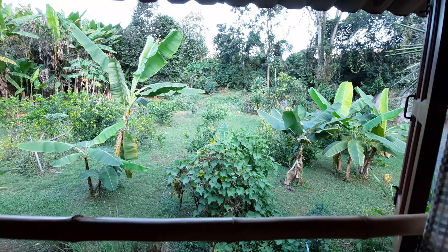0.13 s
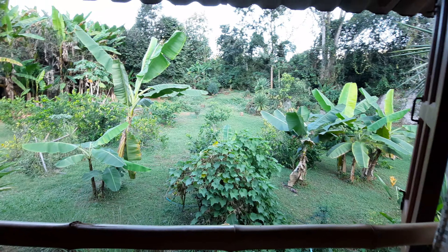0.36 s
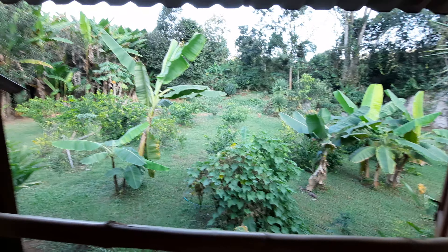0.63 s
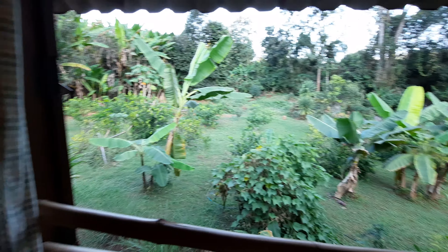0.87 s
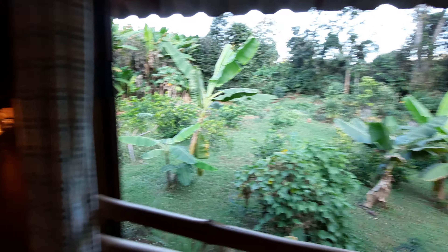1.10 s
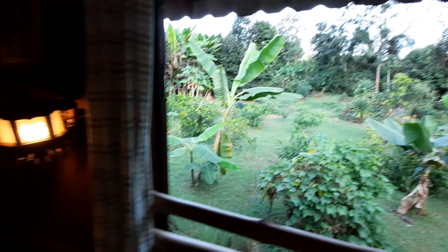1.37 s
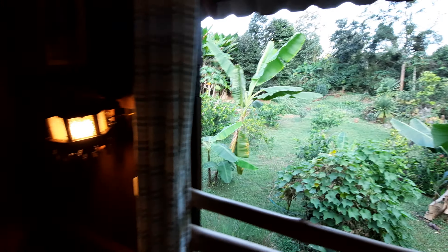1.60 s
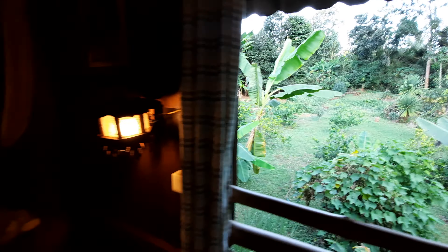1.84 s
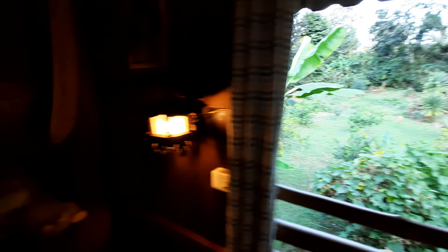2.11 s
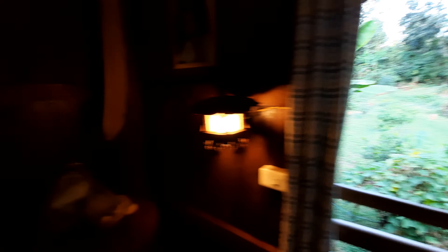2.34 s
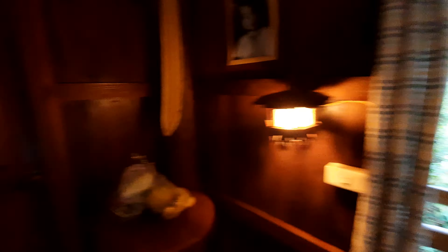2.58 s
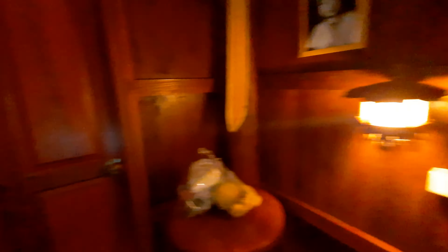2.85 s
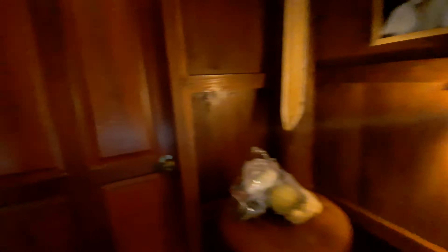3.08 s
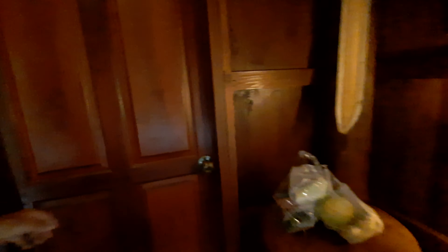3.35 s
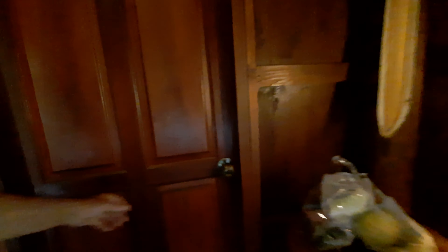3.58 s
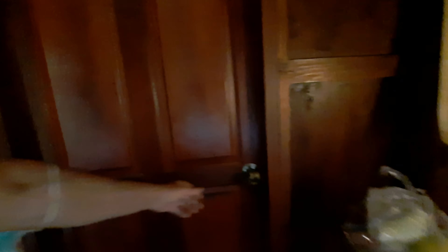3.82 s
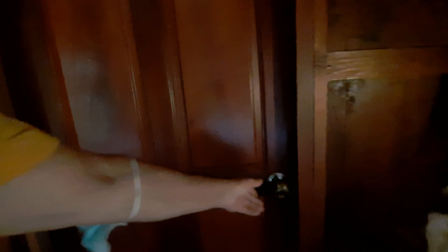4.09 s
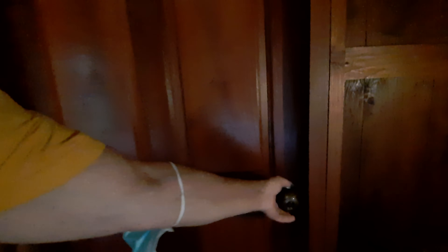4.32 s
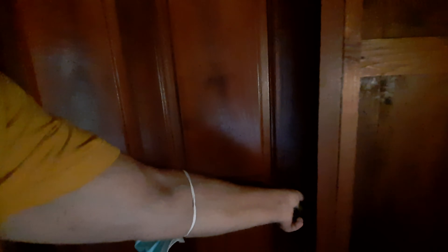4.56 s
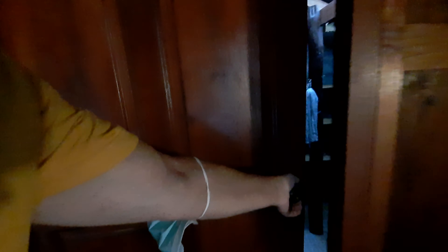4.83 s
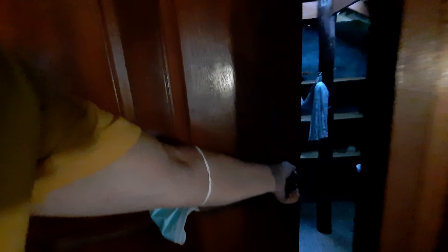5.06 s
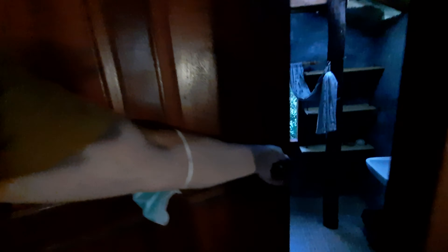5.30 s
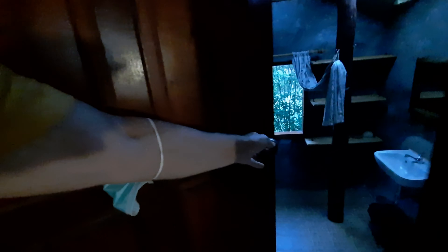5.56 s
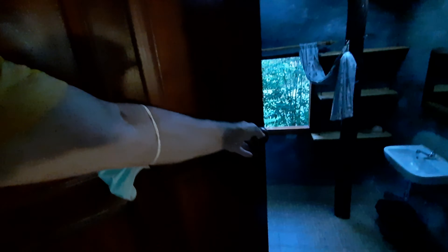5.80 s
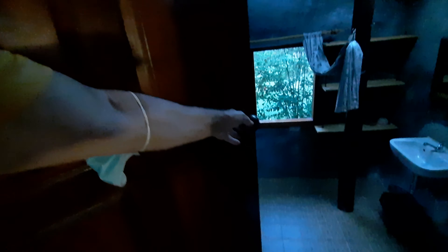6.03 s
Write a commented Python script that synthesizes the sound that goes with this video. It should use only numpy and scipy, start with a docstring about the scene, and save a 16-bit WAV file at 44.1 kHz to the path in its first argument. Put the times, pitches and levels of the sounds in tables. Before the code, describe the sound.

Crickets trill steadily outside a quiet wooden cabin; a stiff door latch snaps and the door jolts open with a loud woody clunk, then softer knocks.

```python
"""A person steps across the boards of a cabin, turns the knob and pulls a stiff wooden door free: noisy jolts
ring the modes of the wood, sharp cracks ring the latch, and narrow noise hums as the door swings.
Sparse random taps make the small wooden room ring after each blow. Through the open window come crickets and
a raspy insect (pulsed noise in resonances), a small bird (falling sines), faint fuzzy tones, and a far engine
(a sum of low harmonics), over quiet air of shaped noise."""
import sys
import numpy as np
from scipy import signal
from scipy.fft import rfft, irfft
from scipy.io import wavfile
from scipy.ndimage import uniform_filter1d

SR = 44100
rng = np.random.default_rng(int(sys.argv[2]) if len(sys.argv) > 2 else 0)


def bounce(signal):
    """Save signal as a 16-bit WAV file at the path given by the first command-line argument."""
    frames = np.transpose(np.atleast_2d(signal))
    limited = np.clip(frames, -1, 1)
    pcm = np.round(limited * 32767).astype(np.int16)
    wavfile.write(sys.argv[1], SR, pcm)


def level_to_linear(level):
    """Convert decibel levels to linear amplitude factors, elementwise."""
    exponent = np.asarray(level, float) / 20
    return 10 ** exponent


N = 272097


def evened(x):
    """Scales to rms 1."""
    return x / np.sqrt(np.mean(x ** 2) + 1e-20)


def read(points, hz):
    """Reads a spectrum table, joined on a log-frequency axis."""
    f, value = np.transpose(points)
    return np.interp(np.log(hz + 1), np.log(f + 1), value)


def follow(rows):
    """Draws the columns of a time curve at every sample."""
    s, *columns = np.transpose(rows)
    return [np.interp(np.arange(N) / SR, s, c) for c in columns]


def add(mix, s, sound):
    """Mixes a stereo sound in at second s, which may lie before the start."""
    first = round(s * SR)
    sound = sound[:, max(-first, 0):]
    part = mix[:, max(first, 0):][:, :sound.shape[1]]
    part += sound[:, :part.shape[1]]


def lean(db):
    """Left and right gains for a level difference, left minus right."""
    return level_to_linear(np.array([db / 2, -db / 2]))


def resonate(x, hz, width):
    """A resonance of gain 1: shifts the curve hz down to zero, smooths, and shifts back."""
    turn = np.exp(2j * np.pi * np.cumsum(hz * np.ones(x.shape[-1])) / SR)
    r = np.exp(-np.pi * width / SR)
    smooth = signal.lfilter([1 - r], [1, -r], x / turn + 1e-18)
    return 2 * (turn * smooth).real


def pair(x, points):
    """Makes the right channel like the left by a share that depends on frequency."""
    z = rfft(x)
    same = np.clip(read(points, np.fft.rfftfreq(x.shape[1], 1 / SR)), -1, 1)
    right = same * z[0] + np.sqrt(1 - same ** 2) * z[1]
    return irfft([z[0], right], x.shape[1])


def wander(seconds, shape):
    """Slow random drift of rms 1: noise smoothed twice."""
    size = round(seconds * SR)
    return evened(uniform_filter1d(uniform_filter1d(rng.standard_normal(shape), size), size))


def hums(rows, blur, pan_db):
    """Noise through a narrow gliding resonance, dying away: a fuzzy tone for each row."""
    out = np.zeros((2, N))
    for s, length, start_hz, end_hz, db in rows:
        n = round(length * SR)
        noise = rng.standard_normal((2, 2 * SR))[:, :n]
        # blur is the width as a share of the starting pitch
        tone = resonate(noise, np.linspace(start_hz, end_hz, n), blur * start_hz)
        level = level_to_linear(db + np.linspace(0, -9, n)) * signal.windows.tukey(n, .5)
        add(out, s, level * evened(tone) * lean(pan_db)[:, None])
    return out


# modes of the panels of door and walls: (frequency [Hz], width [Hz], relative level [dB])
WOOD_MODES = [(68, 22, 0), (110, 18, -7.5), (151, 20, -16), (193, 11, -5.5), (257, 25, -6), (291, 22, -4),
              (375, 60, 2.5), (437.3, 13, 1), (549.5, 40, -9.5), (638, 30, -9.5), (779, 76, -11),
              (878, 30, -5), (1005, 200, -4), (1260, 86, -4.5), (1966, 100, -2.5), (2290, 89, -3.5),
              (2646, 250, -6)]
# left-right likeness of door and room: (frequency [Hz], likeness [-1 to 1])
DOOR_LIKENESS = [(60, 1), (250, 0.9), (700, .6), (1500, .2), (3500, 0.06), (15000, -.1)]


def blow(db, contact, fall_db):
    """A jolt chatters for the contact time and drives the wood; returns the direct sound and the walls' share."""
    t, hz = np.arange(20000) / SR, np.fft.rfftfreq(20000, 1 / SR) + 1
    jolt = pair(rng.standard_normal((2, len(t))), DOOR_LIKENESS)
    # a hard, light tap barely moves the big panels
    bass_db = 0.29 * max(8.5 - fall_db, 0) * np.minimum(np.log2(hz / 500), 0)
    tilt = level_to_linear(bass_db - fall_db * np.log2(1 + hz / 400))
    edges = np.sqrt((1 + (70 / hz) ** 4) * (1 + (hz / 3500) ** 2))
    soft = irfft(rfft(jolt) * tilt / edges)
    contact = max(contact, .002)
    rise_s = .0008 + 0.21 * contact
    soft *= (1 - np.exp(-t / rise_s)) * np.exp(-t / contact)
    panels = sum(level_to_linear(mode_db) * resonate(soft, f, width) for f, width, mode_db in WOOD_MODES)
    # the blows carry no deep bass below about 55 Hz
    panels, soft = signal.lfilter(*signal.butter(3, 55, "high", fs=SR), [panels, soft])
    direct = panels + 0.34 * soft
    to_walls = 0.43 * panels + 0.54 * soft
    return level_to_linear(db) / abs(direct).max() * np.array([direct, to_walls]) * lean(3.5)[:, None]


# blows and rubs on door and boards:
# (time [s], direct peak before the stereo lean [dB], contact [s], least 2 ms in use, treble fall [dB/octave])
BLOWS = [(0.121, -51, 0.032, 11), (3.99, -52.5, 0.067, 14.5), (4.4, -49.5, 0.0098, 4),
         (4.413, -41, 0.053, 4.5), (4.444, -33.5, 0.02, 2.5), (4.486, -36, 0.012, 7.5),
         (4.503, -35, 0.018, 8), (4.52, -27, 0.013, 6.5), (4.53, -13.5, 0.017, 5.5),
         (4.553, -15, 0.012, 13), (4.617, -15.5, 0.017, -1.5), (4.65, -10.5, 0.0019, 1.5),
         (4.656, -10.5, 0.0043, 3), (4.86, -54, 0.078, 12), (5.05, -59, 0.086, 16), (5.189, -58, .05, 12.5),
         (5.275, -60.5, .02, 0.5), (5.311, -43, 0.011, 3.5), (5.321, -33, 0.01305, 4),
         (5.344, -29, 0.021, 5), (5.383, -42, 0.0066, 2), (5.43, -47, 0.023, 7.5), (5.48, -49.5, 0.04, 10),
         (5.577, -42.5, 0.024, 14), (5.62, -48.5, 0.025, 23.5), (5.735, -66.5, 0.072, 10.5),
         (5.891, -43, 0.025, 8), (5.94, -45, 0.019, 18.5)]


def door_and_boards(near, spread):
    """Strikes every blow and rub, into the near sound and into what reaches the walls."""
    for s, *row in BLOWS:
        direct, to_walls = blow(*row)
        add(near, s, direct)
        add(spread, s, to_walls)


# rings of knob and bolt: (frequency [Hz], width [Hz], relative level [dB])
LATCH_MODES = [(3690, 390, 7.5), (5820, 480, 3), (6340, 117, 2), (9210, 430, -10), (11440, 340, 2),
               (12750, 360, -0.5)]


def click(db):
    """A sharp crack rings the latch; returns the direct sound and what reaches the walls."""
    t, hz = np.arange(4096) / SR, np.fft.rfftfreq(4096, 1 / SR) + 1
    jolt = pair(rng.standard_normal((2, len(t))), DOOR_LIKENESS)
    edges = np.sqrt((1 + (2500 / hz) ** 2) * (1 + (hz / 13000) ** 8))
    crack = irfft(rfft(jolt) / edges) * np.exp(-t / 0.0014)
    ring = sum(level_to_linear(mode_db) * resonate(crack, f, width) for f, width, mode_db in LATCH_MODES)
    direct = ring + 0.059 * crack
    to_walls = 0.56 * ring + 0.17 * crack  # thin rings beam at the listener, so the walls get less
    return level_to_linear(db) / abs(ring).max() * np.array([direct, to_walls]) * lean(1)[:, None]


# clicks of knob and bolt: (time [s], peak of the ring before the stereo lean [dB])
CLICKS = [(4.412, -49), (4.444, -37.5), (4.486, -57.5), (4.522, -27.5), (4.53, -33), (4.617, -1.5),
          (4.651, -25.5), (4.656, -28), (5.31, -55.5), (5.321, -57.5), (5.344, -63), (5.384, -60)]


def knob_and_bolt(near, spread):
    """Snaps every click of the latch, into the near sound and into what reaches the walls."""
    for s, db in CLICKS:
        direct, to_walls = click(db)
        add(near, s, direct)
        add(spread, s, to_walls)


# hums of the moving door: (time [s], length [s], start pitch [Hz], end pitch [Hz], starting level [dB])
SWING = [(4.82, 0.56, 1000, 985, -72), (4.85, 0.34, 1348, 1283, -78), (4.82, 0.35, 375, 370, -65.5),
         (5.575, 0.17, 960, 960, -69), (5.885, 0.12, 2670, 2615, -70.5), (5.89, 0.17, 1500, 1450, -68)]


def swing():
    """The swinging door hums faintly on its hinges: wide, fuzzy gliding tones."""
    return hums(SWING, blur=.06, pan_db=4.5)


# strokes: (time [s], length [s], level before the stroke's shape [dB], rise [share of length], lowest [Hz])
BRUSHES = [(.105, 0.077, -61.5, 0.21, 910), (2.99, 0.089, -71, 0.057, 1400),
           (3.33, 0.3, -64.5, 0.088, 1480), (3.45, 0.12, -66.5, 0.37, 1390), (3.86, 0.24, -68.5, 0.37, 890)]
# colour of every stroke: (frequency [Hz], relative density [dB per Hz])
BRUSH_COLOUR = [(180, -29), (300, -24), (555, 0.5), (1810, -3.5), (4230, -10), (4910, -5.5), (14000, -8),
                (16000, -11)]


def brushes():
    """Cloth and soles brushing: fine clumped grains of sliding under a soft stroke."""
    out = np.zeros((2, N))
    size = 16384
    hz = np.fft.rfftfreq(size, 1 / SR)
    for s, length, db, rise, low_hz in BRUSHES:
        grains = rng.standard_normal((2, size)) * level_to_linear(2.5 * wander(0.00052, size))
        low_cut = np.sqrt(1 + (low_hz / (hz + 1)) ** 6)
        grains = irfft(rfft(grains) * level_to_linear(read(BRUSH_COLOUR, hz)) / low_cut)
        along = np.arange(size) / SR / length
        stroke = np.interp(along, [0, np.clip(rise, .01, .9), 1], [0, 1, 0])
        add(out, s, level_to_linear(db) * evened(grains) * stroke * lean(2.6)[:, None])
    return out


# ring of the small wooden room: (frequency [Hz], time to fall 60 dB [s])
ROOM_DECAY = [(80, .55), (250, .45), (700, .38), (1600, .4), (2800, .47), (4000, .4), (6000, .31),
              (14000, .22)]


def room(x):
    """Sparse taps of random sign, one in every 20 samples, each band dying at its own speed."""
    taps = np.zeros((2, SR))
    slots = np.arange(200, SR - 20, 20)
    at = slots + rng.integers(0, 20, (2, len(slots)))
    np.put_along_axis(taps, at, rng.choice([-1., 1.], at.shape), 1)
    hz, t, z = signal.stft(pair(taps, DOOR_LIKENESS), SR, nperseg=512)
    fall_db = -60 * t / read(ROOM_DECAY, hz)[:, None]
    # the harder room behind the door: 20 dB fainter, and 1.8 times slower to die
    beyond_db = -20 + fall_db / 1.8
    tail = signal.istft(z * np.hypot(level_to_linear(fall_db), level_to_linear(beyond_db)), SR, nperseg=512)[1]
    return signal.fftconvolve(x, tail / np.linalg.norm(tail[0]), axes=1)[:, :N]


# chorus as the listener turns from the window: (time [s], level [dB], left minus right [dB])
CHORUS = [(0, -71, -2), (1, -70.5, -3), (1.6, -71.5, -4), (2.2, -71.5, -6), (2.8, -73, -3),
          (3.2, -75.5, -2), (4.4, -77, -1), (5, -79, 0), (5.8, -80.5, 0), (6.17, -79.5, 0)]
# near singers are narrow, the far crowd is a wide blur:
# (frequency [Hz], width [Hz], mean pulse rate [1/s], relative level [dB])
CRICKETS = [(4870, 70, 57, -1), (4820, 110, 66, -6), (5150, 70, 44, 0), (5190, 110, 54, -5),
            (5020, 400, 40, -4), (4600, 450, 47, -8)]


def crickets():
    """Each wing stroke is a short tone; leaves scatter it differently to either ear."""
    out = np.zeros((2, N))
    for hz, width, rate, db in CRICKETS:
        turns = np.cumsum(rate * (1 + 0.057 * wander(0.37, N))) / SR + rng.random()
        strokes = (0.3 + np.sin(np.pi * turns) ** 2) * level_to_linear(db + 1.5 * wander(0.086, N))
        tone = resonate(resonate(rng.standard_normal((2, N)), hz, width), hz, 1.8 * width)
        out += strokes * evened(tone)
    level_db, pan_db = follow(CHORUS)
    return evened(out) * level_to_linear(level_db) * lean(pan_db)


# a higher, raspier insect: (time [s], level [dB], left minus right [dB])
RASP_LEVEL = [(0, -75, 3), (.5, -74.5, 4), (1.2, -75.5, 1), (1.7, -77, -2), (2.4, -80, -4), (3.2, -81, -2),
              (3.7, -82.5, 0), (5.1, -85, 1), (6.17, -83, 2)]
# its wing resonances: (frequency [Hz], width [Hz], relative level [dB])
RASP_BANDS = [(8700, 1400, 0), (9700, 1200, -2), (11000, 1300, -11)]


def rasp():
    """Quick regular scrapes ring a broad high wing resonance that slides down along each scrape."""
    scrapes_per_s, slide_half_hz = 102, 500  # mean rate; slides from +500 to -500 Hz
    along = np.cumsum(scrapes_per_s * (1 + 0.046 * wander(0.27, N))) / SR % 1
    scrapes = rng.standard_normal((2, N)) * (0.98 + np.sin(np.pi * along) ** 2)
    slide_hz = slide_half_hz * (1 - 2 * along)
    ring = np.zeros((2, N))
    for hz, width, db in RASP_BANDS:
        sliding = resonate(scrapes, hz + slide_hz, width)
        ring += level_to_linear(db) * resonate(sliding, hz, width)
    level_db, pan_db = follow(RASP_LEVEL)
    return evened(ring) * level_to_linear(level_db) * lean(pan_db)


# chips of a small bird: (time [s], peak before the stereo lean [dB])
CHIPS = [(1.8141, -82), (2.0894, -82), (2.145, -79), (2.3394, -88), (2.3817, -79), (2.4244, -76),
         (2.6144, -78), (2.6638, -75), (2.7127, -75)]


def bird():
    """Each chip is a short sine falling in pitch under a smooth swell."""
    out = np.zeros((2, N))
    n = round(0.034 * SR)
    chip = np.sin(2 * np.pi * np.cumsum(np.linspace(4550, 4000, n)) / SR) * np.hanning(n)
    for s, db in CHIPS:
        add(out, s, level_to_linear(db) * chip * lean(-2.3)[:, None])
    return out


# faint tones far away: (time [s], length [s], start pitch [Hz], end pitch [Hz], starting level [dB])
FAR_TONES = [(-.15, 1.14, 1947, 1888, -81), (.2, 0.35, 945, 923, -85), (.32, 0.18, 1530, 1560, -87),
             (.42, 0.19, 993, 1070, -86), (.53, 0.27, 1082, 1094, -82.5), (.5, 0.22, 2600, 2620, -90),
             (.53, 0.33, 2370, 2360, -89), (.78, 0.13, 1200, 1240, -90), (1.36, 0.35, 2224, 2110, -87),
             (2.72, 0.16, 1124, 1150, -86)]


def far_tones():
    """Faint fuzzy tones that glide, well to the left."""
    return hums(FAR_TONES, blur=.012, pan_db=17.5)


# the engine slowing down: (time [s], firing rate [Hz])
ENGINE_SPEED = [(0, 22.3), (.4, 22.2), (2, 20.2), (3.2, 20), (3.6, 19.78), (5.2, 19.65), (6.17, 19.35)]
# its sound through the open window, before the fade: (frequency [Hz], level per harmonic [dB])
EXHAUST = [(60, -85), (90, -76.5), (115, -75), (140, -81), (165, -95.5), (210, -97), (243, -74.5),
           (270, -79), (300, -107)]
# its boom through the walls, swelling as the listener steps from the window:
# (time [s], level of a harmonic at the favoured pitch [dB])
BOOM = [(0, -77), (1.2, -81), (1.6, -70), (2.45, -63.5), (2.8, -61.5), (3.04, -67.5), (3.2, -60),
        (3.6, -60.5), (4.2, -59), (4.4, -62), (5.1, -67), (5.5, -69.5), (5.8, -61), (6.17, -79)]


def engine():
    """Low harmonics of the firing rate beat into a throb, by the window and, booming, through the walls."""
    rate, boom_db = follow(ENGINE_SPEED)[0], follow(BOOM)[0]
    turns = np.cumsum(rate) / SR
    # the window path fades by 3.5 dB/s once the listener turns away at 0.47 s
    fade_db = 3.5 * np.maximum(np.arange(N) / SR - 0.47, 0)
    hum = np.zeros(N)
    for k in range(3, 14):
        by_window = level_to_linear(read(EXHAUST, k * rate) - fade_db)
        # the room favours 92 Hz; 10 dB down 27 Hz away
        by_walls = level_to_linear(boom_db - 10 * ((k * rate - 92) / 27) ** 2)
        waver = level_to_linear(2.6 * wander(0.058, N))  # each harmonic wavers by itself
        tone = np.cos(2 * np.pi * (k * turns + rng.random()))
        hum += np.hypot(by_window, by_walls) * waver * tone
    return np.sqrt(2) * hum * lean(2.1)[:, None]


# quiet air of room and garden: (frequency [Hz], relative density [dB per Hz])
AIR_COLOUR = [(20, -33.5), (40, -4.5), (100, -4.5), (175, -10.5), (263, -7.5), (489, -19), (1000, -25),
              (2000, -29), (4000, -39), (6500, -39), (16000, -43.5)]
# (frequency [Hz], left-right likeness [-1 to 1, clipped there])
AIR_LIKENESS = [(60, 0.42), (180, 0.78), (550, -0.034), (1650, -0.12), (4970, 0.22), (15000, -2)]
# (frequency [Hz], left minus right before the likeness mix [dB])
AIR_LEAN = [(60, 0.5), (180, -2), (550, 6.5), (1650, 4.5), (4970, 2.5), (15000, 1.5)]


def air():
    """Random short-time spectra with faint drifting patches."""
    hz = np.fft.rfftfreq(2048, 1 / SR)[:, None]
    a, b, patches = rng.standard_normal((N // 512 + 5, 1025, 2, 3)).T
    patches = evened(uniform_filter1d(uniform_filter1d(patches[0], 20, 0), 12, 1))
    # lean() yields one column of gains per ear
    z = (a + 1j * b) * level_to_linear(read(AIR_COLOUR, hz) + 0.5 * patches) * lean(read(AIR_LEAN, hz))
    noise = signal.istft(z, nperseg=2048, noverlap=1536)[1][:, :N]
    return level_to_linear(-69.5) * evened(pair(noise, AIR_LIKENESS))


def scene():
    """Person and door inside the ringing room, garden and engine outside."""
    near = brushes()
    spread = near.copy()  # what reaches the walls
    door_and_boards(near, spread)
    knob_and_bolt(near, spread)
    inside = near + level_to_linear(-5.5) * room(spread) + swing()
    outside = crickets() + rasp() + bird() + far_tones() + engine()
    return inside + outside + air()


def low_pass(x):
    """Removes everything above the highest recorded frequency."""
    return signal.sosfilt(signal.butter(12, 15850, fs=SR, output="sos"), x)


def record(dry):
    """The microphone drops the deepest bass and adds its own hiss, strongest in the top octave."""
    heard = signal.lfilter(*signal.butter(2, 35, "high", fs=SR), dry)
    noise = rng.standard_normal(dry.shape)
    hiss = evened(signal.lfilter(*signal.butter(2, 9000, "high", fs=SR), noise))
    mix = heard + level_to_linear(-85) * hiss
    return low_pass(mix)


dry = scene()
out = record(dry)
bounce(out)
```